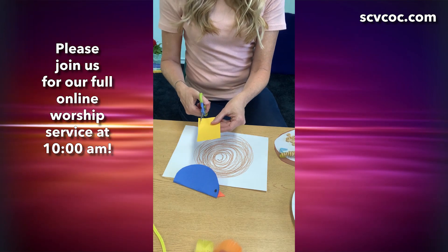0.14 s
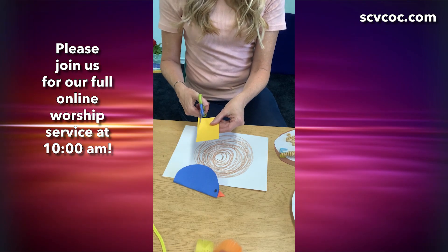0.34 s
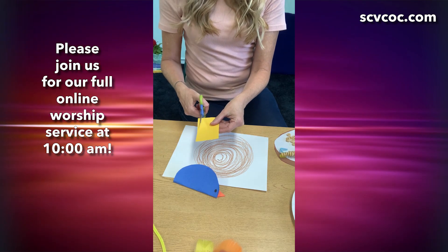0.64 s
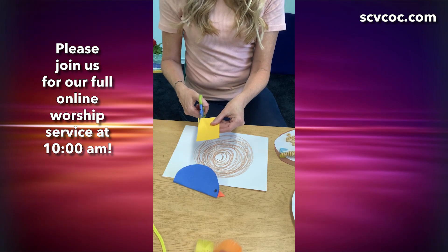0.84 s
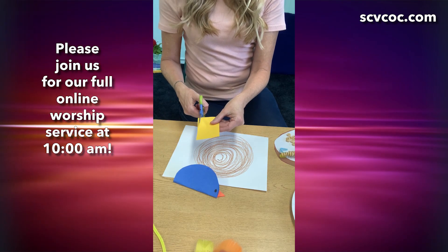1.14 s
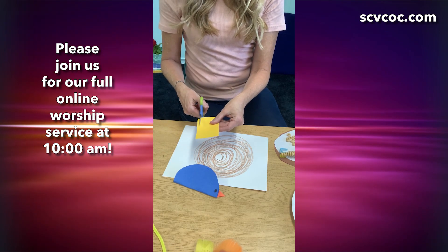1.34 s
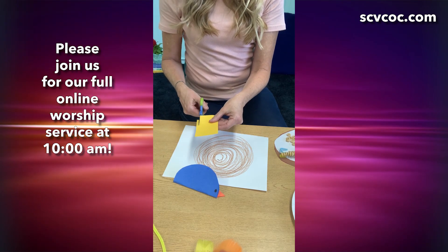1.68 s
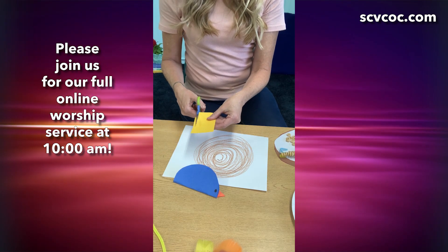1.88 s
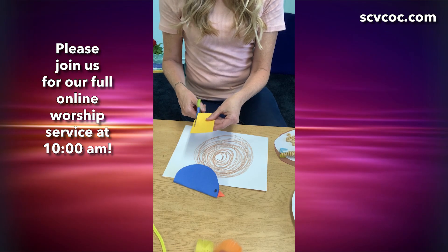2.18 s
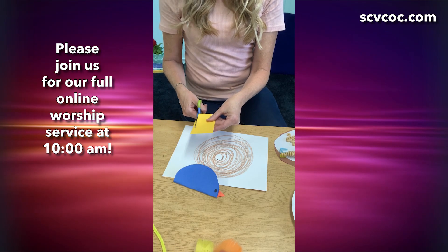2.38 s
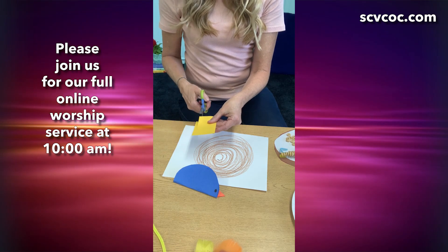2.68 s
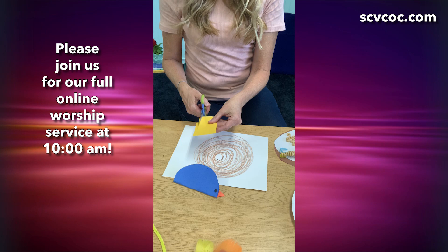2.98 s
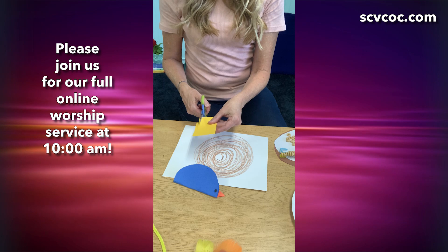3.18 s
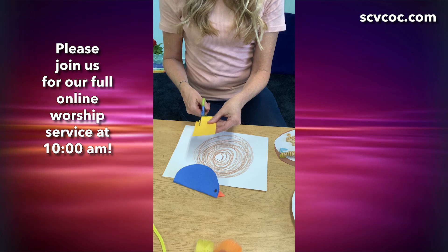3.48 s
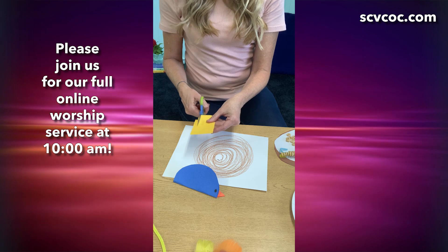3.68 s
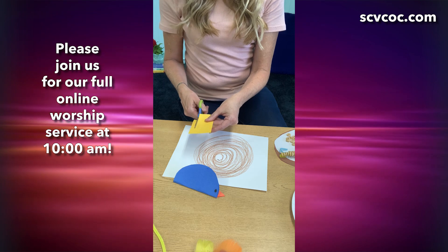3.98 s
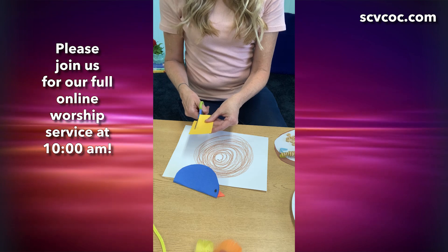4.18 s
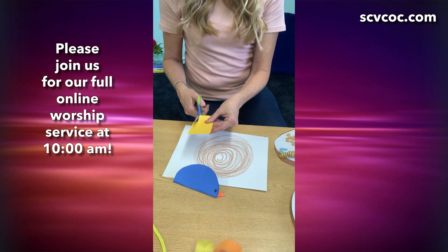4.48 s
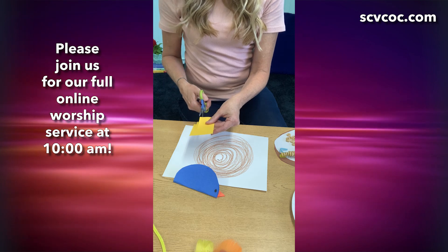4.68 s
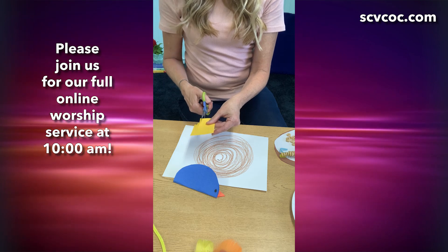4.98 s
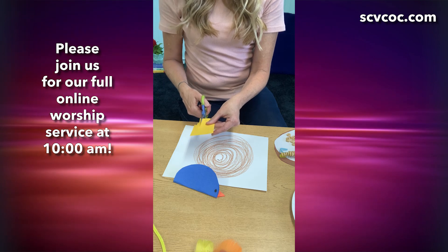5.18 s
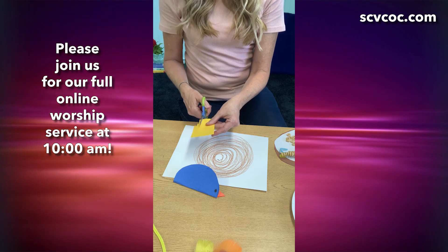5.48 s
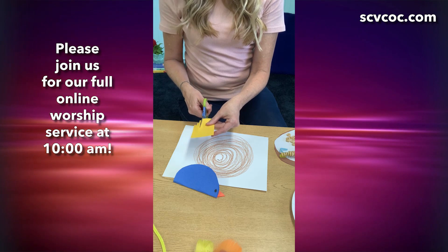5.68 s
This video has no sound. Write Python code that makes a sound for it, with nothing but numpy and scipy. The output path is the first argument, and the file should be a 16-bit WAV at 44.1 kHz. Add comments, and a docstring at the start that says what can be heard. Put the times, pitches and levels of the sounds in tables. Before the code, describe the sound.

Small scissors snip through paper in short, crunchy cuts, with blade scrapes and clicks between them, in a small, dry room.

```python
"""Small scissors cut a slip of paper held over a table in a small, dry room.
Each cut is a crunch of parting fibres, with sharp snaps that shake the free flap of paper.
The blades slide, scrape, squeak once, knock and clink; the handles thud against the fingers.
Faint mains hum, rumble and hiss lie underneath. Stereo, at two microphone ports."""
import sys
import numpy as np
from scipy import signal
from scipy.fft import rfft, irfft, next_fast_len
from scipy.io import wavfile

SR = 44100
rng = np.random.default_rng(int(sys.argv[2]) if len(sys.argv) > 2 else 0)


def put_to_file(sound):
    """Save the sound as 16-bit audio at rate SR, in the file named by the first command-line argument."""
    columns = np.atleast_2d(sound).T  # one column per channel
    safe = np.clip(columns, -1, 1)
    whole_steps = np.round(safe * 32767)
    wavfile.write(sys.argv[1], SR, whole_steps.astype(np.int16))


N = 257323
TAPS = 2048
BINS_HZ = np.fft.rfftfreq(TAPS, 1 / SR)
TIME_S = np.arange(N) / SR

# blades closing through paper: t/s, length/s, flap/dB, crack/dB, swell/dB, mid-cut flap f/Hz
CUTS = [(1.38, 0.014, -52.5, -55.5, 8.5, 823), (1.464, 0.1, -47, -55, 4.5, 980),
        (2.119, 0.213, -57.5, -60.5, -1, 1027), (3.34, .17, -50.5, -53.5, -2.5, 1085),
        (4.046, 0.15, -61, -61, 3, 1302), (5.667, .16, -62, -58.5, -3, 1180)]
# spectrum of the paper flap: f/Hz, level/dB
FLAP_SPECTRUM = [(100, -35.5), (280, -34.5), (480, -18.5), (720, -0.5), (1100, 1), (1700, 0), (2300, -5.5),
                 (3200, -31), (6000, -85.5)]
# spectrum of a crack at the blade: f/Hz, level/dB
CRACK_SPECTRUM = [(700, -30), (1700, -26.5), (2500, -0.5), (3500, -1), (4500, 5), (5300, -4), (6200, -13),
                  (7800, -7.5), (9500, -15), (11500, -11), (15500, -19.5)]


def amp(db):
    """Decibels to gain."""
    return 10 ** (np.asarray(db) / 20)


def unit(x):
    """Scale to rms 1."""
    return x / np.sqrt(np.mean(x ** 2) + 1e-20)


def at_level(x, length_s, db):
    """Set a short sound's rms, its energy taken over length_s plus 2 ms of ring."""
    return x * amp(db) * np.sqrt((length_s + .002) * SR / np.sum(x ** 2))


def read(points, hz):
    """Interpolate a table over log frequency."""
    f, value = np.transpose(points)
    return np.interp(np.log(hz + 1), np.log(f + 1), value)


def curve(points):
    """Interpolate a table over time."""
    return np.interp(TIME_S, *np.transpose(points))


def add(mix, start_s, sound):
    """Mix a sound in at start_s."""
    part = mix[max(round(start_s * SR), 0):][:len(sound)]
    part += sound[:len(part)]


def colour(x, spectrum, boost_db=0):
    """Minimum-phase filter from a spectrum table, plus a boost on BINS_HZ."""
    cepstrum = irfft(np.log(amp(read(spectrum, BINS_HZ) + boost_db)))
    cepstrum[1:TAPS // 2] *= 2
    cepstrum[TAPS // 2 + 1:] = 0
    impulse = irfft(np.exp(rfft(cepstrum)))
    return signal.oaconvolve(x, impulse)[:N]


def resonate(x, hz, width_hz):
    """One resonance following the curve hz."""
    turn = np.exp(2j * np.pi * np.cumsum(hz) / SR)
    pole = np.exp(-np.pi * width_hz / SR)
    return 2 * (turn * signal.lfilter([1 - pole], [1, -pole], x / turn)).real


def grains(per_s, spread_db):
    """Random train of tiny slips, a few much larger than the rest."""
    size = amp(spread_db * np.minimum(rng.exponential(1, N), 3.5))
    return unit(size * rng.choice([-1, 1], N) * (rng.random(N) < per_s / SR))


def burst(length_s, size=1024, per_s=4500, dust=0.23):
    """Milliseconds of rapid slips that swell, then stop."""
    progress = np.arange(size) / SR / max(length_s, .0005)
    slips = rng.standard_normal(size) * (dust + (rng.random(size) < per_s / SR))
    return slips * (1 - np.exp(-2 * progress)) * np.exp(-progress ** 4)


def stroke(start_s, length_s, swell_db, attack_db_per_s, release_db_per_s):
    """Gain of one movement: rises until start_s, swells or fades steadily, dies away."""
    t = TIME_S - start_s
    attack_db = attack_db_per_s * np.minimum(t, 0)
    ramp_db = swell_db * (np.clip(t / length_s, 0, 1) - .5)
    release_db = release_db_per_s * np.maximum(t - length_s, 0)
    return amp(attack_db + ramp_db - release_db)


def uneven(depth_db, count=300):
    """Gain of a grip that catches and lets go at random."""
    knots_s = np.linspace(0, TIME_S[-1], count)
    return amp(depth_db * np.interp(TIME_S, knots_s, rng.standard_normal(count)))


def background(rumble_db=-70, air_db=-75, alike_below_hz=260):
    """Mains hum, low rumble alike at both ports, and faint hiss that is not."""
    # rumble spectrum, room air spectrum, mains harmonics: f/Hz, level/dB
    rumble_spectrum = [(20, -16), (45, -2), (85, 5), (140, -1), (220, -19), (400, -27), (1500, -67.5)]
    air_spectrum = [(100, -14), (300, -1), (650, -4), (1500, -3), (2500, -7), (4200, -7), (6300, -12),
                    (8500, -18), (15500, -24)]
    harmonics = [(59.5, -74), (119.7, -80), (179, -90.5)]
    hz = np.fft.rfftfreq(N, 1 / SR)
    noise = rfft(rng.standard_normal((3, N)))
    alike = 1 / (1 + (hz / alike_below_hz) ** 2)
    pair = np.sqrt(alike) * noise[0] + np.sqrt(1 - alike) * noise[1:]
    rumble = unit(irfft(pair * amp(read(rumble_spectrum, hz)), N))
    air = unit(irfft(pair * amp(read(air_spectrum, hz)), N))
    hum = sum(amp(db) * np.sqrt(2) * np.sin(2 * np.pi * (f * TIME_S + rng.random()))
              for f, db in harmonics)
    return amp(rumble_db) * rumble + amp(air_db) * air + hum


def ports(x):
    """Near sound reaches the two ports with different phase and level."""
    # phase between ports: f/Hz, left lead/rad
    phase = [(50, 0), (500, -.7), (2200, -.6), (2700, .1), (3200, .6), (4400, 0), (6000, -1.1),
             (8000, -2.1), (9700, -3.14), (12000, -4.4), (14500, -6.2), (16000, -6.4)]
    # balance between ports: f/Hz, left minus right/dB
    balance = [(300, 1), (800, -.5), (1400, -3), (2200, -7), (3000, -1), (3600, 0), (16000, 0)]
    size = next_fast_len(N + TAPS)
    hz = np.fft.rfftfreq(size, 1 / SR)
    half = np.exp(.5j * read(phase, hz)) * amp(read(balance, hz) / 2)
    return irfft(rfft(x, size) * np.array([half, 1 / half]), size)[:, :N]


def room(x, shared=0.18, build_s=0.00057, reflections_per_s=4000):
    """Near echoes, then a short diffuse tail, partly alike at both ports."""
    # echoes off table and body: delay/s, level/dB
    echoes = [(.0027, -18.5), (.0074, -15.5), (0.0112, -33.5), (0.0186, -20)]
    # tail decay: f/Hz, T60/s
    decay = [(200, 0.072), (1000, 0.2), (3000, 0.14), (7000, 0.27), (15000, 0.39)]
    # feed to the tail: f/Hz, level/dB
    send = [(200, 0), (600, -2.5), (1300, -3), (3000, -1), (6000, -13.5), (15000, -31)]
    near = x.copy()
    for delay_s, db in echoes:
        add(near, delay_s, amp(db) * x)
    shape = (3, SR // 2)  # shared, left, right
    reflections = rng.standard_normal(shape) * (rng.random(shape) < reflections_per_s / SR)
    hz, t, bands = signal.stft(reflections, SR, nperseg=256)
    fade = amp(-60 * t / read(decay, hz)[:, None]) * (1 - np.exp(-t / build_s))
    fade /= np.linalg.norm(fade, axis=1, keepdims=True)
    tail = signal.istft(bands * fade, SR, nperseg=256)[1]
    tail /= np.linalg.norm(tail, axis=1, keepdims=True)
    wet = signal.fftconvolve(colour(x, send)[None], tail, axes=1)[:, :N]
    return ports(near + np.sqrt(shared) * wet[0]) + np.sqrt(1 - shared) * wet[1:]


def diffuse_spread(x, size=384, peak_s=.0011):
    """A few milliseconds of diffuse spread, different at each port, widen and soften the sound."""
    # diffuse share: f/Hz, level/dB
    share = [(300, -12), (1000, -18), (2500, -15), (5000, -14), (15000, -13)]
    t = np.arange(size) / SR
    taps = rng.standard_normal((2, size)) * t * np.exp(-t / peak_s)
    taps /= np.linalg.norm(taps, axis=1, keepdims=True)
    return signal.oaconvolve(colour(x, share)[None], taps, axes=1)[:, :N]


def slides():
    """Fine, dense friction of the blades over each other and along the paper."""
    # strokes: t/s, length/s, hiss level/dB, swell/dB, body re hiss/dB, fizz re hiss/dB
    strokes = [(0.267, 0.082, -68.5, 11, -8.5, -11), (0.397, 0.019, -59.5, 5.5, -4.5, -14),
               (0.811, 0.083, -64.5, 5.5, -3, -14.5), (0.969, 0.034, -68, 10.5, 4, -10),
               (1.087, 0.074, -74.5, 8.5, -7, -7), (1.3, 0.11, -64, 0, -6.5, 0.5),
               (2.504, 0.082, -48.5, -17, -1, -1.5), (2.866, 0.055, -54, 3, -10.5, -2),
               (2.939, 0.071, -54, 13.5, -2.5, -12.5), (3.27, 0.08, -59, 6.5, -9, -3.5),
               (3.641, 0.068, -54, 2.5, -0.5, -4.5), (3.722, 0.0089, -45, -12, -25, 4),
               (3.777, .13, -47, -7.5, -4, -8), (3.935, 0.022, -57, 9.5, 2, -10.5),
               (4.442, 0.036, -66, 21, 8, -6.5), (4.483, 0.06, -59, -4, 1, 5.5),
               (4.538, 0.0082, -52.5, -2, -2, -5), (5.098, 0.072, -62.5, 11.5, -5.5, -5),
               (5.23, 0.052, -72.5, 8.5, -0.5, -22), (5.34, 0.01, -61, 4, 1, -17),
               (5.59, 0.14, -63, 13, -8, 0.5)]
    # low, middle and top bands of the friction: f/Hz, level/dB
    body_spectrum = [(100, -32), (300, -18), (520, -12), (700, -6), (900, -1), (1250, 0), (1900, -1),
                     (2400, -4), (3500, -24), (6000, -50)]
    hiss_spectrum = [(800, -44), (1800, 8.5), (2500, 8), (3600, 14), (4900, 10.5), (6200, -10), (8000, -14),
                     (15500, -33.5)]
    fizz_spectrum = [(3000, -41), (5500, 2), (6800, 4.5), (8000, 9), (9300, -11), (10500, -9.5), (12000, 2),
                     (15500, -14)]
    rub = grains(per_s=6000, spread_db=5) * uneven(depth_db=3.5)
    body, hiss, fizz = (unit(colour(rub, band)) for band in (body_spectrum, hiss_spectrum, fizz_spectrum))
    out = np.zeros(N)
    for start_s, length_s, db, swell_db, body_db, fizz_db in strokes:
        gain = stroke(start_s, length_s, swell_db, attack_db_per_s=3002, release_db_per_s=494)
        out += amp(db) * gain * (hiss + amp(body_db) * body + amp(fizz_db) * fizz)
    return out


def scrapes():
    """A rubbed blade sings in one resonance that glides with the point of contact."""
    # blade resonances: t/s, length/s, level/dB, first f/Hz, last f/Hz, width/Hz
    glides = [(.262, .18, -68, 3500, 3450, 900), (.82, .14, -64, 2900, 2700, 1400),
              (1.55, .11, -55, 3000, 2850, 400), (1.65, .085, -71, 2700, 2800, 400),
              (2.08, .035, -51, 3200, 3150, 700), (2.861, .05, -57, 3450, 3400, 700),
              (3.712, .03, -45, 5300, 5550, 700), (5.088, .11, -62, 4500, 4800, 800),
              (5.7, .13, -61, 4350, 4400, 700)]
    out = np.zeros(N)
    rub = grains(per_s=2500, spread_db=3.5)
    for start_s, length_s, db, first_hz, last_hz, width_hz in glides:
        slips = rub[round(start_s * SR):][:round(length_s * SR)]
        hz = np.linspace(first_hz, last_hz, len(slips))
        tone = resonate(resonate(slips, hz, width_hz), hz, width_hz)
        add(out, start_s, amp(db) * unit(tone * signal.windows.tukey(len(slips), .5)))
    return out


def squeak(start_hz=1523, top_hz=2500, rise_hz_per_s=4900, tone_db=-5, rasp_db=-3, singing=.4):
    """Stick-slip of tight blades opening: a climbing resonance that sings more under pressure."""
    # squeak envelope: t/s, level/dB
    envelope = [(1.766, -47.5), (1.78, -39), (1.818, -51), (1.868, -45.5), (1.91, -45), (1.92, -39),
                (2.002, -43), (2.05, -63)]
    # blade chatter: f/Hz, level/dB
    chatter_spectrum = [(200, -35), (600, -18), (1100, -2), (2000, 0), (3500, -5), (4300, 2), (4750, 4),
                        (5500, -19), (8000, -16), (15500, -22)]
    db = curve(envelope)
    start_s, end_s = envelope[0][0], envelope[-1][0]
    hz = np.clip(start_hz + rise_hz_per_s * (TIME_S - start_s), start_hz, top_hz)
    slips = grains(per_s=2000, spread_db=1.8)
    tone = unit(resonate(resonate(slips, hz, width_hz=650), hz, width_hz=650))
    rasp = unit(colour(slips, chatter_spectrum))
    sound = amp(tone_db + singing * (db - db.max())) * tone + amp(rasp_db) * rasp
    return amp(db) * uneven(depth_db=0.35) * sound * (TIME_S > start_s) * (TIME_S < end_s)


def thuds(length_s=0.0018):
    """Plastic handles thud against the fingers at the end of a stroke."""
    # handle impacts: t/s, level/dB
    impacts = [(1.533, -49), (1.577, -40.5), (2.305, -53.5), (4.4814, -40)]
    # dull handle spectrum: f/Hz, level/dB
    spectrum = [(120, -20), (280, -15), (400, -4.5), (560, -2.5), (800, 3.5), (2000, -35.5), (6000, -80)]
    out = np.zeros(N)
    for start_s, db in impacts:
        add(out, start_s, at_level(colour(burst(length_s), spectrum), length_s, db))
    return out


def clinks(ring_db=-15):
    """Steel strikes steel: a hard click and a short ring, damped by the hand."""
    # blade contacts: t/s, length/s, level/dB
    contacts = [(1.578, .003, -41), (1.6265, .002, -45), (2.068, .0015, -36), (2.0715, .003, -26.5),
                (2.078, .002, -32), (2.305, .003, -39), (2.424, .002, -42), (3.461, .003, -39)]
    # blade modes: f/Hz, level/dB, T60/s
    modes = [(2910, 0, .22), (3010, -3, .18), (3350, -1, .14), (3500, 3, .11), (4550, -3, .08)]
    # steel click: f/Hz, level/dB
    click_spectrum = [(300, -39.5), (900, -21), (2200, -1.5), (3000, -2.5), (3550, 9), (4100, 2.5),
                      (4600, 2), (5500, -21.5), (8000, -17), (15500, -21.5)]
    out, t = np.zeros(N), np.arange(SR // 2) / SR
    for start_s, length_s, db in contacts:
        ring = sum(amp(mode_db - 60 * t / t60_s) * np.sin(2 * np.pi * (hz * t + rng.random()))
                   for hz, mode_db, t60_s in modes)
        click = colour(burst(length_s), click_spectrum)
        add(out, start_s, at_level(click, length_s, db))
        add(out, start_s, at_level(ring, length_s, db + ring_db))
    return out


def hits(rows, pitch_hz, width_hz, peak_db, body_trim_db, crack_trim_db, spread_octaves=0.22):
    """Each burst cracks at the blade and rings a damped low resonance near the curve pitch_hz."""
    out = np.zeros(N)
    for start_s, length_s, body_db, crack_db in rows:
        slips = burst(length_s)
        detune = 2 ** rng.uniform(-spread_octaves, spread_octaves)
        hz = pitch_hz[min(round(start_s * SR), N - 1)] * detune
        peak_power = amp(peak_db) ** 2 / (1 + ((BINS_HZ - hz) / (width_hz / 2)) ** 2)
        body = colour(slips, FLAP_SPECTRUM, boost_db=10 * np.log10(1 + peak_power))
        crack = colour(slips, CRACK_SPECTRUM)
        add(out, start_s, at_level(body, length_s, body_db + body_trim_db))
        add(out, start_s, at_level(crack, length_s, crack_db + crack_trim_db))
    return out


def knocks(body_hz=1356):
    """Blades and handles knock as they turn or stop, ringing the hand-held scissors."""
    # knocks before trim: t/s, length/s, body/dB, crack/dB
    impacts = [(.4455, 0.0036, -47, -54), (.454, 0.0067, -55.5, -48), (.467, 0.0032, -61, -53),
               (.55, 0.0047, -56.5, -52), (1.014, 0.011, -55, -51.5), (1.6265, 0.00045, -40.5, -40),
               (1.7635, 0.0047, -43.5, -37), (2.424, 0.0022, -38.5, -32), (2.5078, 0.00093, -31.5, -21),
               (2.998, 0.0044, -37, -54.5), (3.018, 0.0018, -48, -40.5), (3.646, 0.0029, -45, -30.5),
               (3.724, 0.0066, -41.5, -31), (3.787, 0.012, -42.5, -43), (3.798, 0.0032, -43, -33),
               (4.3245, 0.0051, -33, -32), (4.336, 0.0046, -40.5, -45), (4.48, 0.0016, -32.5, -24.5),
               (4.5215, 0.0014, -55, -34.5)]
    pitch_hz = np.full(N, body_hz)
    return hits(impacts, pitch_hz, width_hz=500, peak_db=8, body_trim_db=-1.5, crack_trim_db=-9.5)


def flap_hz(rise_octaves=0.49):
    """The paper flap's resonance climbs in each cut as the blades advance."""
    half_rise = 2 ** (rise_octaves / 2)
    points = []
    for start_s, length_s, *_, hz in CUTS:
        points += [(start_s, hz / half_rise), (start_s + length_s, hz * half_rise)]
    return curve(points)


def crunch(crack_swell=0.67):
    """Single fibres part under the blade; the flap rings with them."""
    fibres = grains(per_s=1000, spread_db=4.5)
    sheet = colour(fibres, FLAP_SPECTRUM)
    flap = unit(resonate(sheet, flap_hz(), width_hz=280) + .12 * sheet)
    crack = unit(colour(fibres, CRACK_SPECTRUM))
    edges = dict(attack_db_per_s=349, release_db_per_s=460.5)
    out = np.zeros(N)
    for start_s, length_s, flap_db, crack_db, swell_db, _ in CUTS:
        out += amp(flap_db) * stroke(start_s, length_s, swell_db, **edges) * flap
        out += amp(crack_db) * stroke(start_s, length_s, crack_swell * swell_db, **edges) * crack
    return out


def snaps():
    """The loudest fibres give way and shake the flap, which rings longer than the scissors' body."""
    # fibre breaks before trim: t/s, length/s, flap/dB, crack/dB
    breaks = [(1.445, 0.012, -44, -48), (1.458, 0.0021, -38, -70), (1.482, 0.0045, -36.5, -41),
              (1.496, 0.014, -39.5, -45.5), (1.5325, 0.0075, -34, -35), (1.553, 0.0059, -34.5, -39),
              (1.5755, 0.0047, -36.5, -34), (2.126, 0.0076, -42, -38), (2.148, 0.0056, -41.5, -43),
              (2.165, 0.0075, -46, -47.5), (2.183, 0.0053, -40.5, -46), (2.2165, 0.0022, -35.5, -40.5),
              (2.2295, 0.0028, -28.5, -41.5), (2.2725, 0.0057, -30, -39.5), (2.303, 0.0067, -27.5, -31),
              (3.34, 0.0051, -43.5, -43.5), (3.356, 0.007, -41, -45.5), (3.377, 0.007, -55, -43),
              (3.387, 0.0055, -38, -40.5), (3.431, 0.008, -36.5, -36.5), (3.445, 0.0034, -37, -47.5),
              (3.459, 0.0073, -36.5, -31.5), (3.474, 0.0029, -30.5, -40.5), (3.502, 0.0065, -34.5, -32),
              (4.015, 0.009, -49, -46.5), (4.05, 0.0055, -59.5, -46), (4.075, 0.0024, -46.5, -50),
              (4.103, 0.0067, -35, -41), (4.1235, 0.0058, -36, -64), (4.132, 0.0081, -37.5, -43),
              (4.1565, 0.0063, -33.5, -42.5), (4.176, 0.0069, -51, -47), (4.23, 0.0019, -38, -47),
              (5.709, 0.0065, -57.5, -45.5), (5.738, 0.0023, -54, -46), (5.765, 0.0056, -59, -52),
              (5.783, 0.0028, -48, -37), (5.8215, 0.0066, -71, -45)]
    return hits(breaks, flap_hz(), width_hz=240, peak_db=10, body_trim_db=-3, crack_trim_db=-3)


def scene():
    """Scissors and paper in the room."""
    direct = snaps() + knocks() + thuds() + clinks() + crunch() + slides() + scrapes() + squeak()
    return room(direct) + diffuse_spread(direct) + background()


def record(dry):
    """Steep low-pass band limit."""
    cutoff_hz = 16100
    taps = signal.firwin(511, cutoff_hz, window=("kaiser", 9), fs=SR)
    return signal.oaconvolve(dry, taps[None], "same")


dry = scene()
out = record(dry)
put_to_file(out)
```